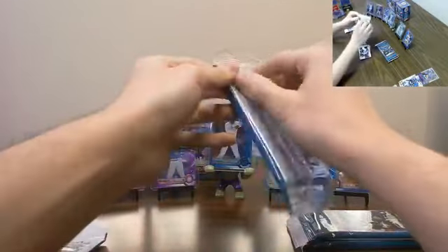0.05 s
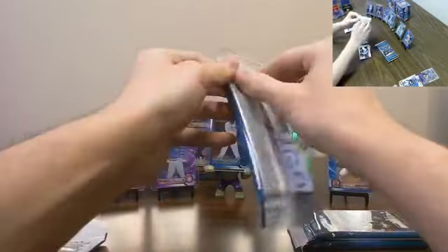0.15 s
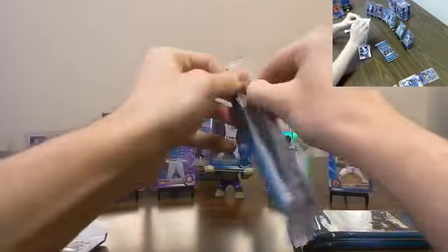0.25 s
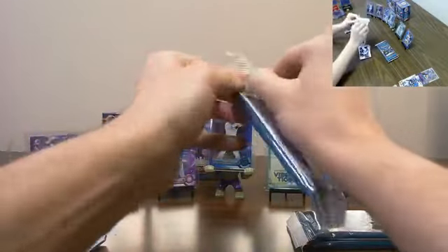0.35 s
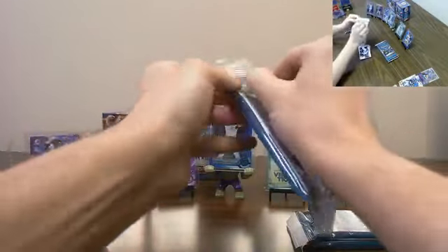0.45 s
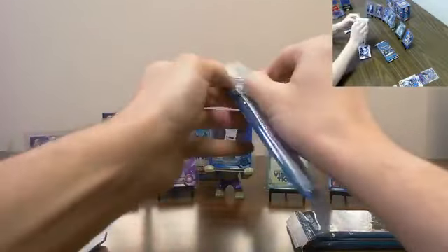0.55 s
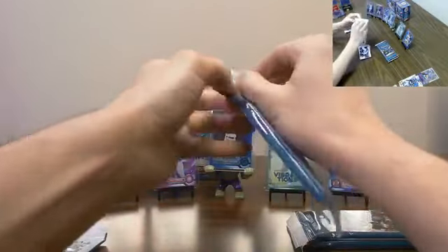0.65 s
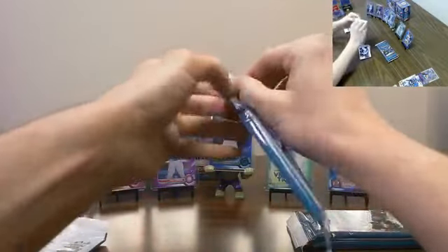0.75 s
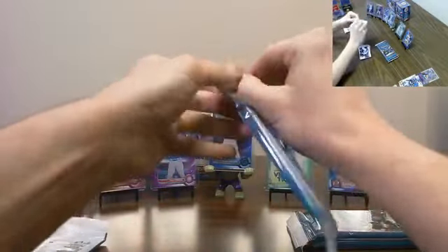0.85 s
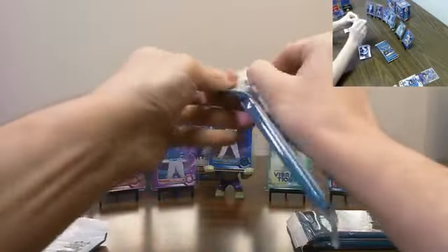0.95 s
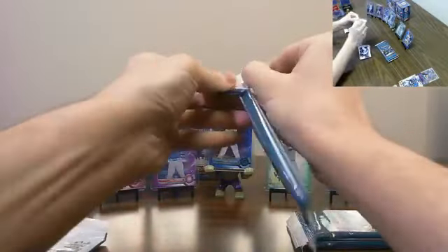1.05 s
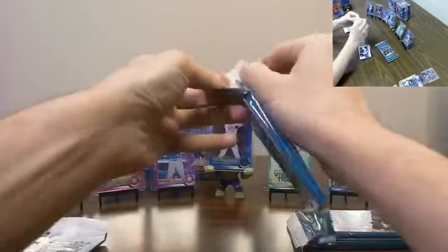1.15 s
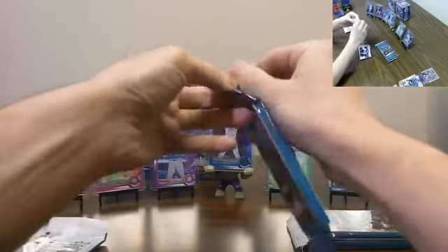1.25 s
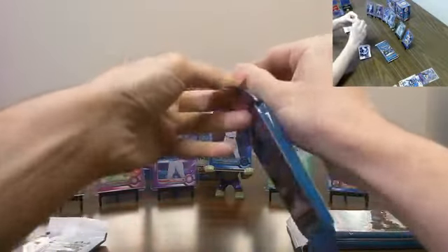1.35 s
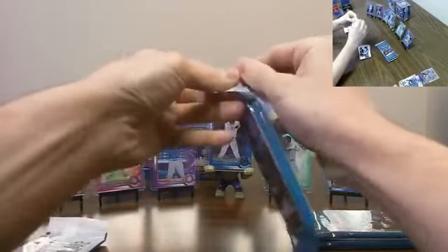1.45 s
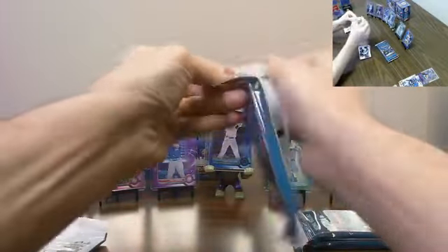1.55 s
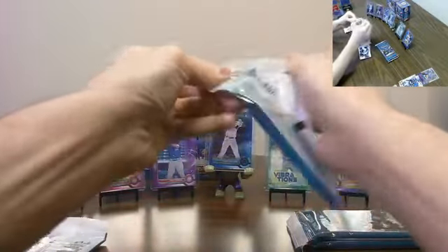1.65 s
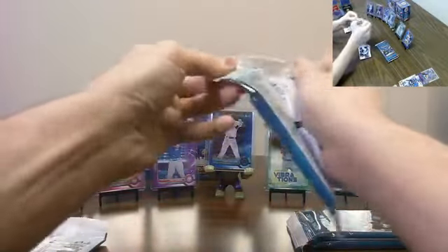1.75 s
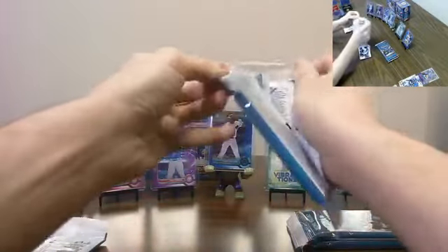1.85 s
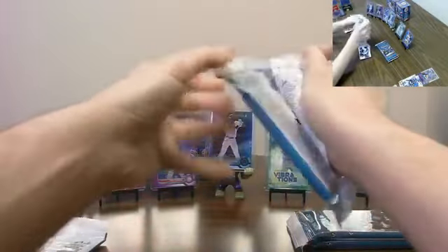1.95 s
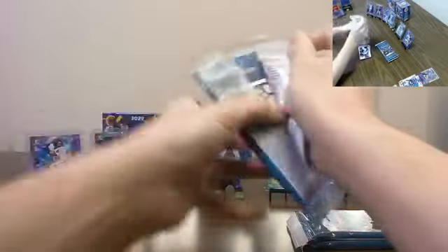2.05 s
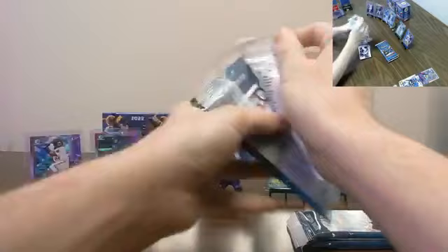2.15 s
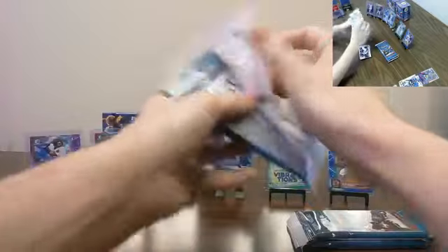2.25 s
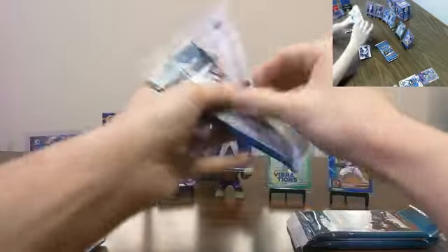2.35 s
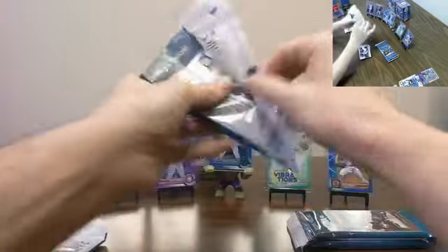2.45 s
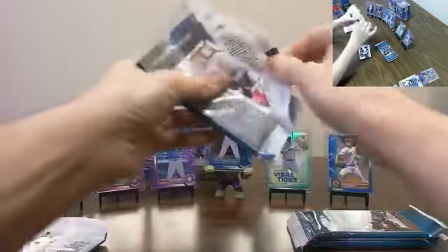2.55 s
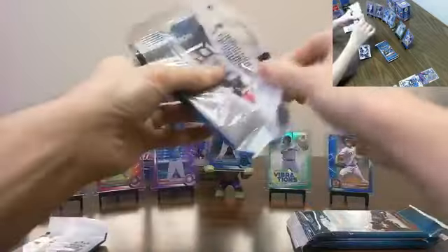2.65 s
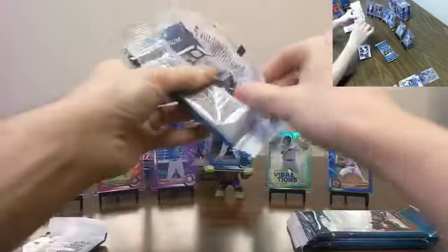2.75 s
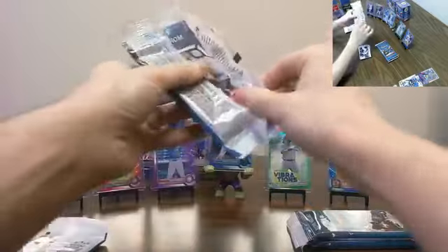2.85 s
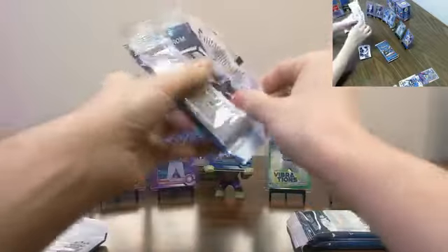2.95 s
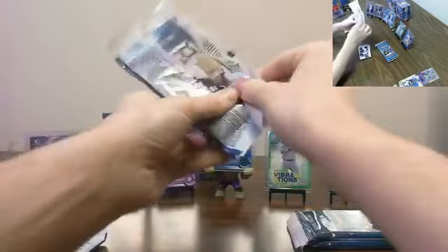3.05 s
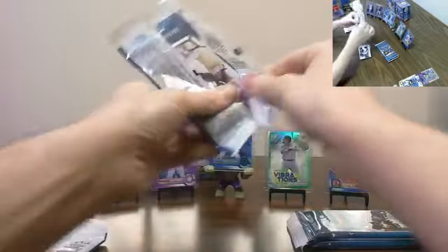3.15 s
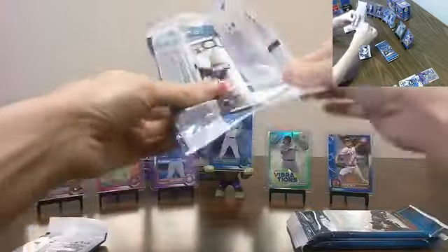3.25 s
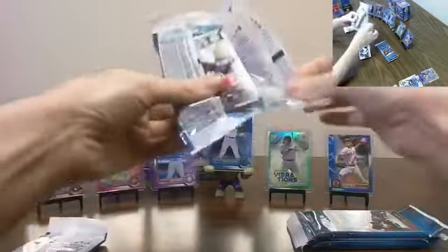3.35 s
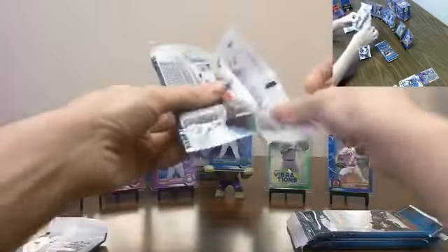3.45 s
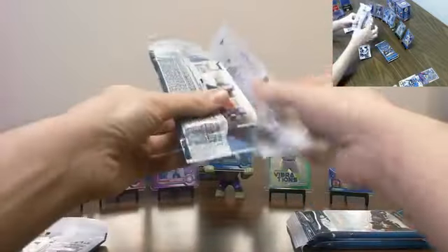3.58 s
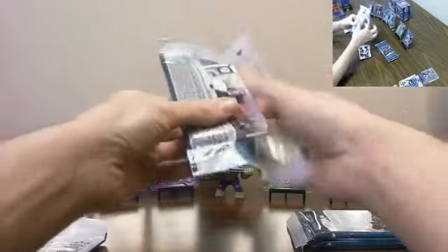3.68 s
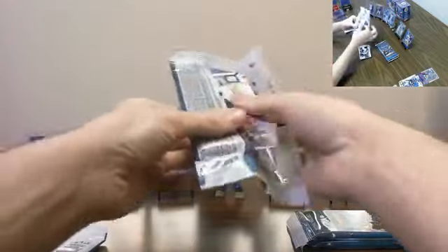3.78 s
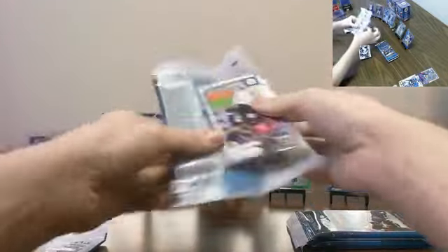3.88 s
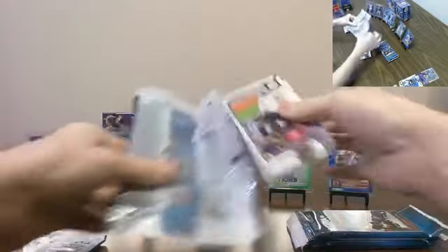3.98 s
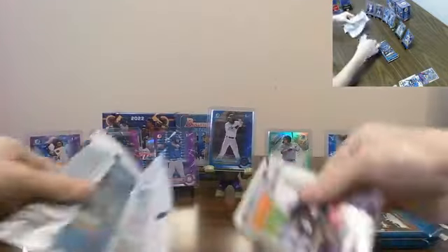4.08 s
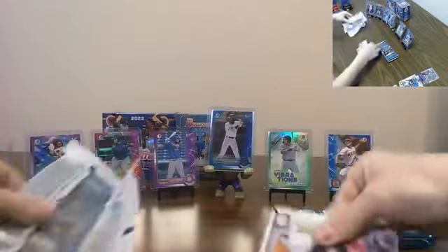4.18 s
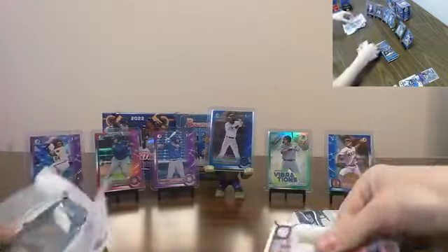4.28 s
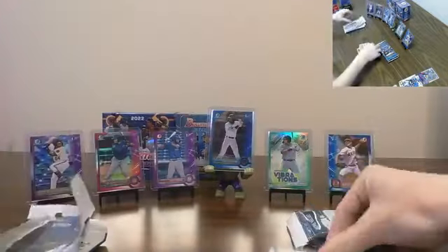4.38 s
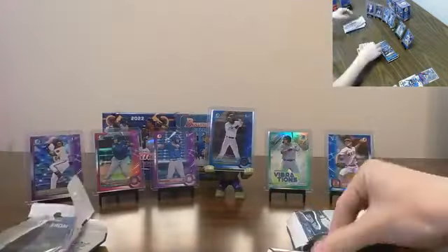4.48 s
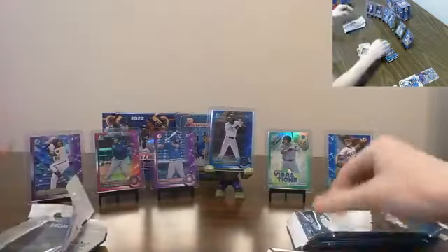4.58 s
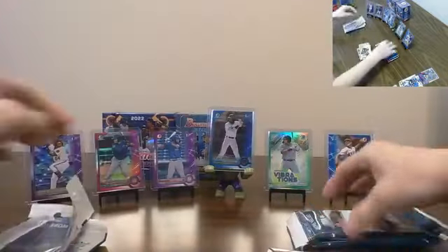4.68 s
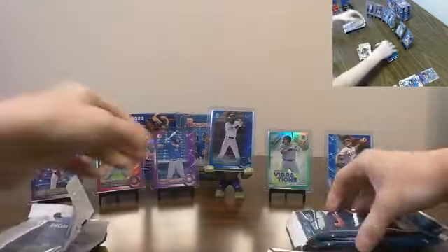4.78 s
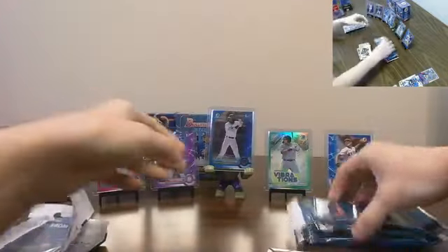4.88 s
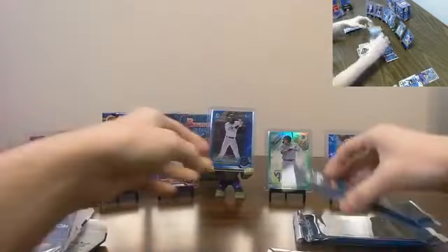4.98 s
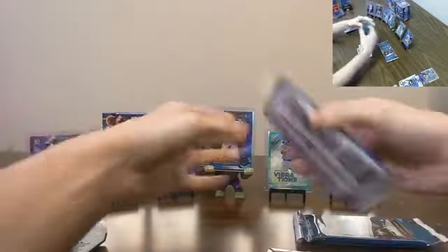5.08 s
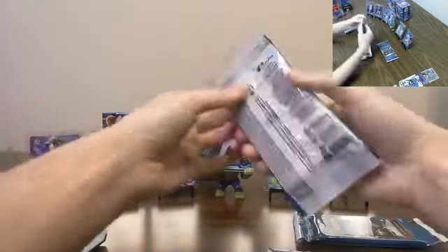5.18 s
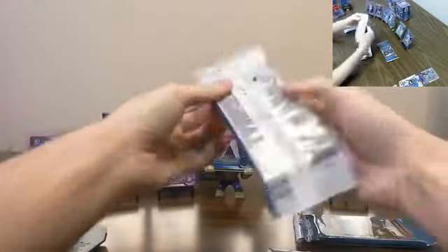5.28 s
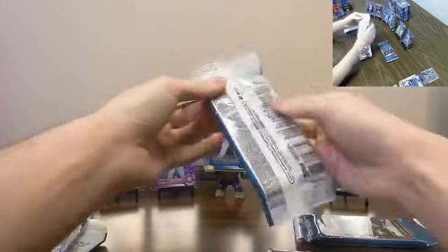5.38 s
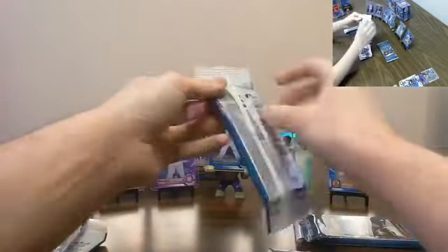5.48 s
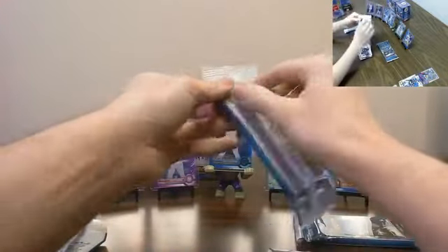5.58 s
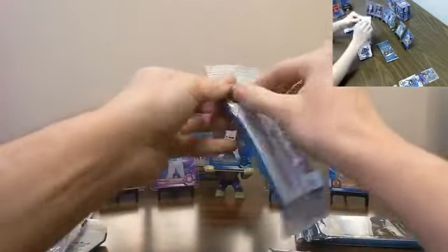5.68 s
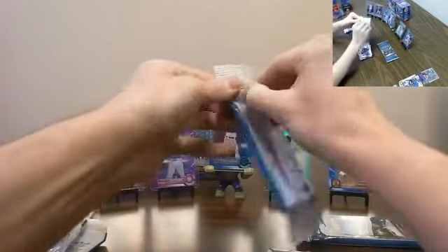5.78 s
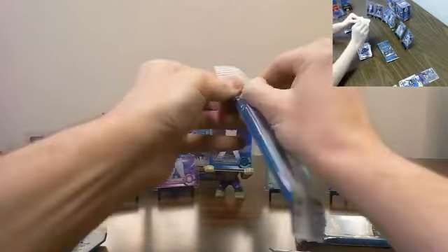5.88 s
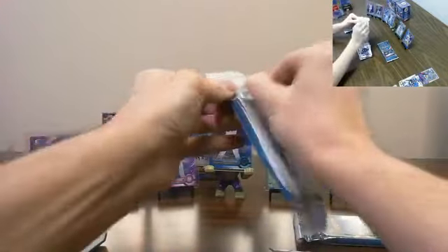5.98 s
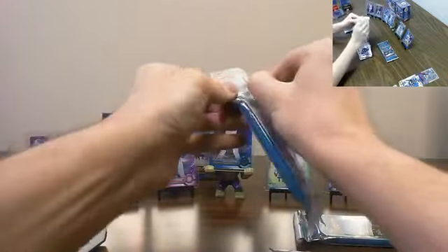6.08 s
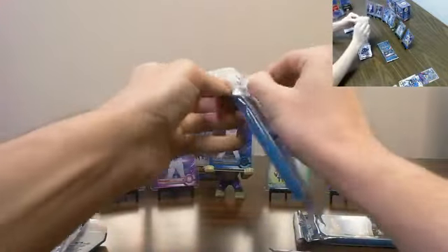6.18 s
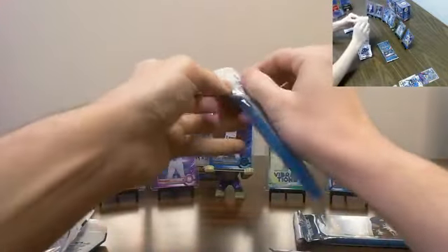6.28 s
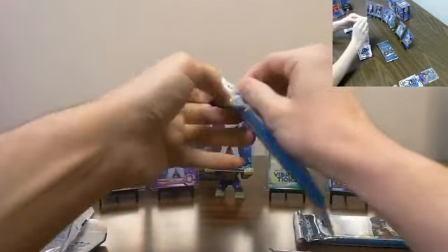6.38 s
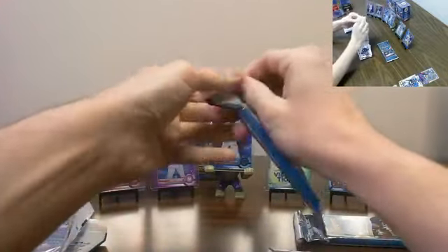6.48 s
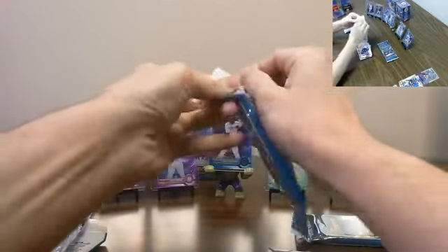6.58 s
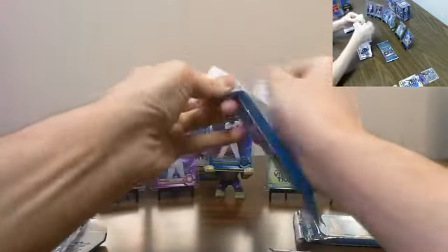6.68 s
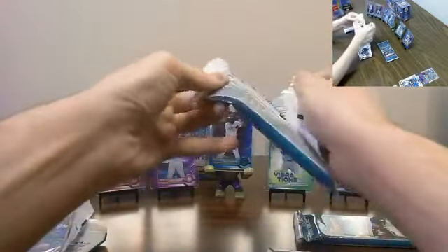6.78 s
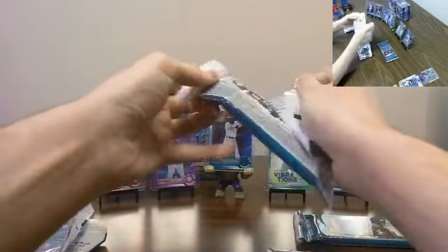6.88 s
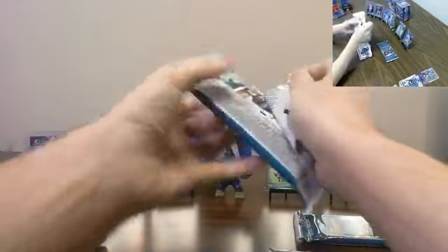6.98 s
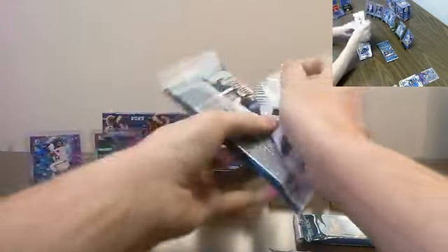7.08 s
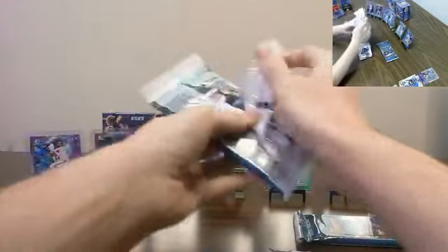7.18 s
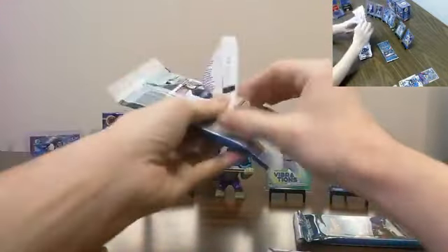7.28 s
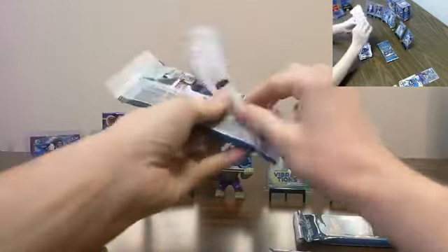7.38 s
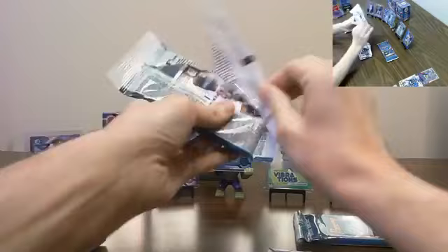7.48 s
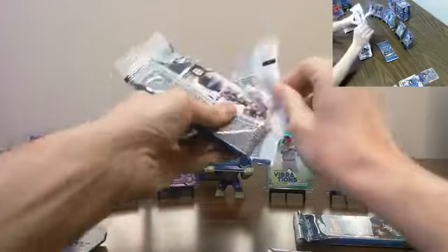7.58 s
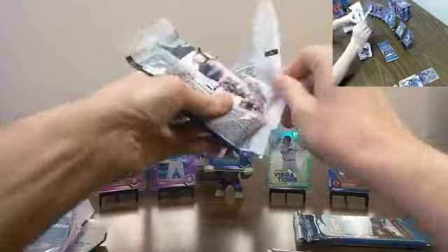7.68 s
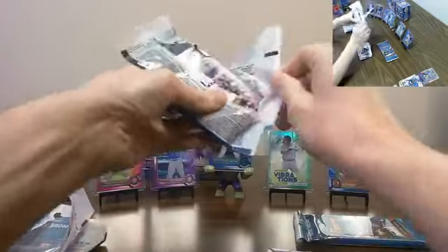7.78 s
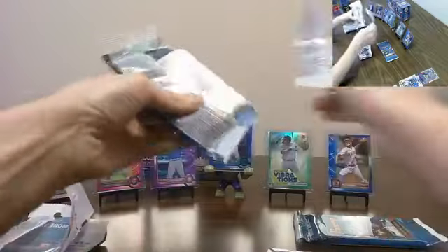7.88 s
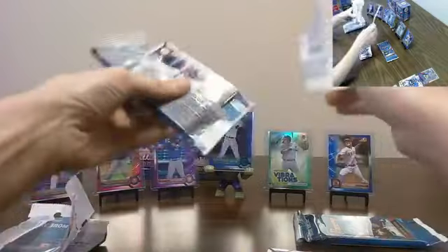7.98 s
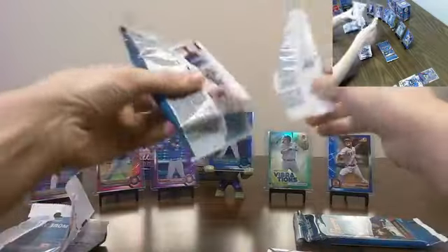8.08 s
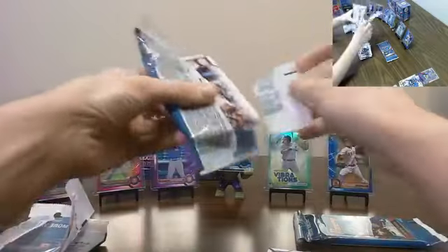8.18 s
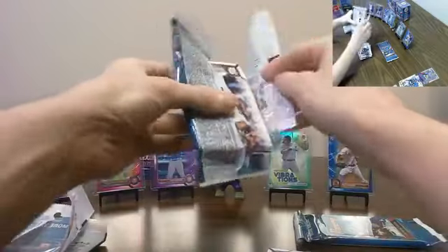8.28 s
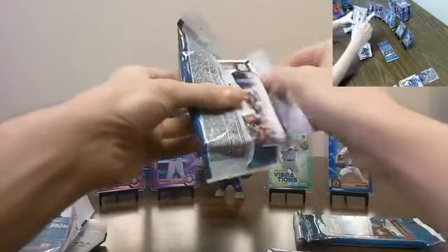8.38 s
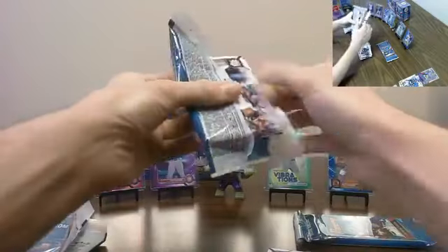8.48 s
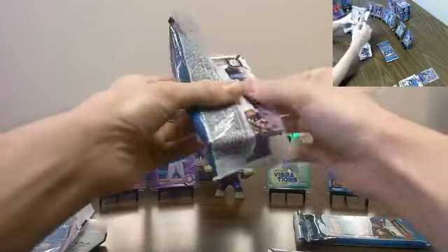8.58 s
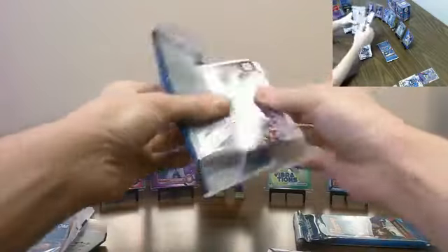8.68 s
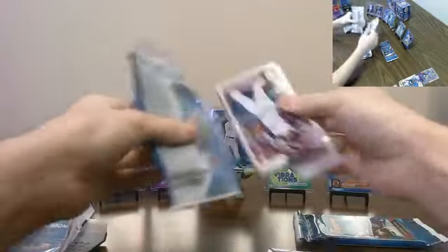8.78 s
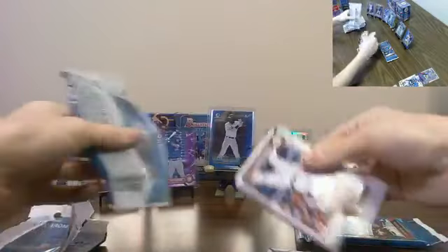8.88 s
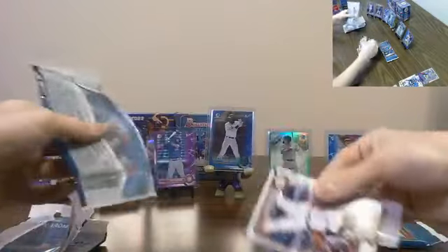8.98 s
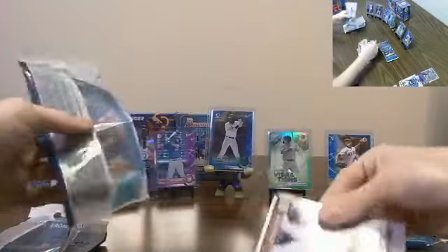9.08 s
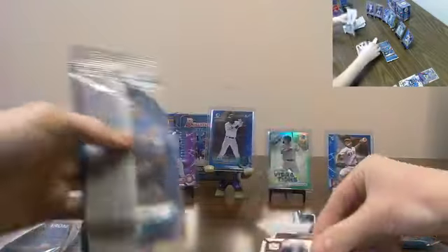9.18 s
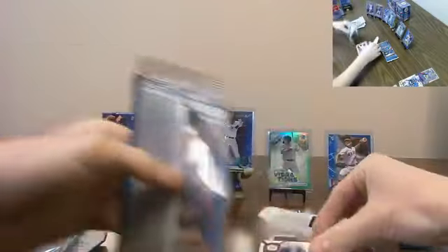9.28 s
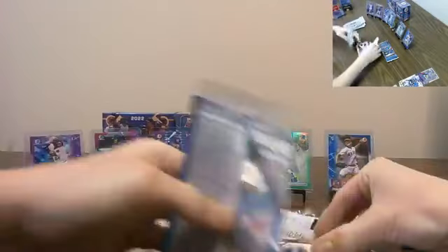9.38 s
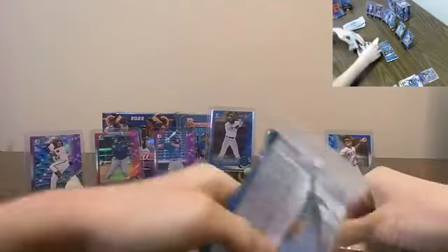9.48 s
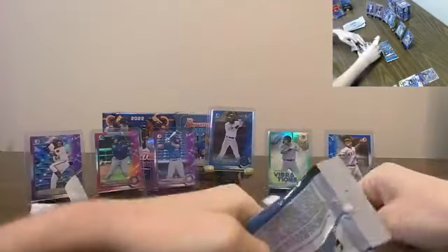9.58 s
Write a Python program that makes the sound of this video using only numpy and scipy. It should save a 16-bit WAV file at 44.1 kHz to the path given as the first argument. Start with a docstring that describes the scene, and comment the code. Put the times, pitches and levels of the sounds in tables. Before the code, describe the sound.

Close up in a small room, fingers pinch and crumple a stiff cellophane pack: sharp bright snaps, dense crinkles, short rips. Cards slide out and land with soft dull knocks. After a near-quiet pause a second pack is picked up, crackled, torn open and emptied the same way. Faint room air, low electrical throb and a barely audible thin whine lie underneath.

```python
'''In a small room, two cellophane card packs are pinched, ripped open and emptied over a table.
Stiff film buckles in single snaps, dense rip runs and small creases: random slips trigger ringing noise clicks.
Sliding film and cards give a fine rub, denser and weaker clicks; knocks are decaying low noise bands.
All of it passes through room echoes; room air, a low electrical throb and a thin whine are added dry.'''
import sys
import numpy as np
from scipy import signal
from scipy.fft import rfft, irfft
from scipy.io import wavfile
from scipy.ndimage import uniform_filter1d

SR = 44100
rng = np.random.default_rng(int(sys.argv[2]) if len(sys.argv) > 2 else 0)


def output_pcm(signal):
    """Save a mono or channel-first signal as 16-bit PCM at the path in sys.argv[1].

    Samples are clipped to [-1, 1] before scaling.
    """
    pcm = np.clip(np.atleast_2d(signal).T, -1, 1) * 32767
    wavfile.write(sys.argv[1], SR, np.round(pcm).astype(np.int16))


N = 425124
TIME_S = np.arange(N) / SR
MIDDLE_HZ = 4200  # reference pitch of the facets
FIRM_DB = -16.5  # table level of a firm snap


# clearest single buckles: start_s, level_db (relative), pitch_hz (nominal)
SNAPS = [(0.069, -35, 3700), (0.1388, -25, 4840), (0.1718, -18.5, 6500), (0.178, -18.5, 4900),
         (0.2103, -18.5, 4770), (0.2265, -15, 6500), (0.2496, -18.5, 4860), (0.2937, -16, 3960),
         (0.3185, -13.5, 5010), (0.3333, -11, 3240), (0.377, -25.5, 3790), (0.4228, -23, 3820),
         (0.4367, -14, 4130), (0.4458, -15, 3960), (0.4813, -24, 3800), (0.5183, -19.5, 4100),
         (0.5259, -14.5, 5000), (0.5662, -22.5, 2810), (0.6185, -20, 4210), (0.7329, -13.5, 5400),
         (0.7728, -30, 4810), (0.836, -39, 1830), (0.9001, -19, 8800), (0.9059, -16.5, 4810),
         (0.9212, -22, 4830), (0.9268, -19, 3780), (0.9364, -27, 4170), (0.9436, -19, 4600),
         (0.9981, -29, 4300), (1.019, -35, 3980), (1.1415, -29, 2990), (1.161, -34, 2950),
         (1.1986, -38, 4150), (1.271, -27, 3660), (1.303, -29.5, 4130), (1.3442, -30, 3000),
         (1.372, -30, 4960), (1.3824, -15, 4600), (1.437, -30.5, 3860), (1.48, -26, 4050),
         (1.498, -22.5, 4260), (1.5818, -21, 4080), (1.6092, -14.5, 3120), (1.6184, -19, 4880),
         (1.6355, -13.5, 4640), (1.6653, -12.5, 4160), (1.6973, -19, 2900), (1.7057, -16, 2880),
         (1.7686, -27, 3900), (1.7934, -16.5, 4330), (1.834, -29, 4660), (1.8572, -28, 4220),
         (1.8663, -16.5, 4260), (1.9943, -20, 2800), (2.0381, -25.5, 2580), (2.1271, -26.5, 3360),
         (2.1855, -20.5, 3740), (2.3089, -29.5, 3100), (2.3574, -23.5, 4580), (2.4377, -28, 2030),
         (2.5323, -16, 6550), (2.581, -16, 5200), (2.6574, -20, 4840), (2.6674, -16.5, 4370),
         (2.7117, -14, 4060), (2.732, -21.5, 4300), (2.7632, -28, 1960), (2.9171, -27, 5660),
         (2.9395, -24, 3000), (3.02, -25.5, 3380), (3.0614, -15.5, 4150), (3.1084, -18, 3000),
         (3.1308, -14, 3120), (3.2701, -9.5, 3770), (3.3636, -15.5, 3960), (3.3832, -12.5, 4270),
         (3.5019, -26, 5300), (3.5927, -14.5, 3670), (3.6066, -23, 4460), (3.6304, -13.5, 4960),
         (3.6766, -20.5, 5450), (3.8921, -25.5, 2960), (4.164, -41.5, 1680), (4.2255, -38, 3400),
         (4.4547, -29.5, 2360), (4.7628, -41, 3450), (4.855, -37, 3490), (5.1699, -40.5, 2870),
         (5.1868, -35, 2580), (5.246, -34, 3410), (5.2654, -18.5, 2975), (5.2894, -26.5, 3720),
         (5.3233, -36, 4660), (5.383, -36, 3780), (5.4323, -42, 4010), (5.5241, -38, 3210),
         (5.5412, -30.5, 4130), (5.5656, -17.5, 4900), (5.688, -23.5, 6500), (5.7238, -25, 4570),
         (5.7658, -28, 4810), (5.7713, -15, 5230), (5.7746, -14, 4500), (5.7997, -24, 3190),
         (5.8053, -16.5, 3340), (5.8973, -20.5, 3400), (5.9764, -8.5, 4040), (6.2095, -20, 5130),
         (6.2412, -14.5, 6190), (6.3466, -16, 6140), (6.467, -34, 3710), (6.4812, -41, 4820),
         (6.554, -16.5, 7150), (6.6183, -14.5, 5100), (6.6326, -10.5, 4700), (6.698, -25, 5560),
         (6.727, -17, 3620), (6.7416, -23, 4560), (6.769, -17.5, 3520), (6.788, -14, 3380),
         (6.8359, -13.5, 6050), (6.9041, -15, 3800), (6.9416, -17.5, 3820), (7.0647, -29.5, 4300),
         (7.1746, -25, 4340), (7.3141, -33.5, 3040), (7.3607, -27, 4870), (7.3835, -19.5, 4020),
         (7.3947, -26, 3140), (7.4178, -20, 4470), (7.4488, -12, 4360), (7.4771, -11, 4030),
         (7.5847, -23, 4300), (7.646, -16.5, 4170), (7.6648, -14.5, 3752), (7.7061, -18.5, 4260),
         (7.7308, -17.5, 2950), (7.8023, -15.5, 3160), (7.882, -15.5, 4270), (7.9176, -20.5, 4440),
         (7.9688, -21, 3250), (7.983, -13.5, 3870), (8.0004, -17, 3260), (8.0515, -24.5, 4170),
         (8.105, -17.5, 4185), (8.1716, -27.5, 3550), (8.2071, -19, 3590), (8.3727, -23.5, 3660),
         (8.4487, -19.5, 3880), (8.6555, -22.5, 3830), (8.6895, -13.5, 6700), (8.7204, -21, 3850),
         (8.7584, -30, 4160), (8.922, -36, 3340), (9.021, -28, 3260), (9.121, -35, 4350),
         (9.1574, -33, 1960), (9.2384, -20.5, 3860), (9.2715, -20.5, 3700), (9.5687, -17.5, 4000),
         (9.6314, -23.5, 4030)]
FOCUS_DB, FOCUS_PER_DB = 4, 0.3  # a firm snap is broad; a gentler one keeps closer to its own pitch


def snaps(level_db=-11.5, push_db=-33, span_s=0.003, stretch=0.83, lift=0.96,
          give_db=-24, give_s=.0015, lag_s=.0005):
    """Single buckles, each with its own pitch; the crease gives a little just before it flips."""
    out = np.zeros(N)
    for start_s, db, hz in SNAPS:
        size = amp(db) * np.sqrt(span_s * SR)
        pitch_hz = lift * MIDDLE_HZ * (hz / MIDDLE_HZ) ** stretch
        focus_db = FOCUS_DB + FOCUS_PER_DB * (FIRM_DB - db)
        add(out, start_s - give_s * rng.random(), size * amp(give_db) * facet(pitch_hz))
        add(out, start_s + lag_s, size * amp(level_db) * facet(pitch_hz, focus_db))
        add(out, start_s + lag_s, size * amp(push_db) * sheet_share(hz) * push())
    return out


# tautness of the film, heard as the pitch of its creases: time_s, pitch_hz
TAUTNESS = [(0, 4190), (.6, 4314), (1.2, 3294), (1.6, 4040), (2.2, 3420), (3.0, 3170), (3.4, 4346),
            (3.9, 2818), (4.3, 2653), (5.2, 2916), (5.7, 4020), (6.4, 4750), (6.9, 4210), (7.2, 3457),
            (8.0, 3700), (8.7, 3760), (9.1, 3180), (9.6, 3585)]


def neighbours(level_db=-33, before_db=-7, before_s=.005, after_s=0.014, growth=1.3, reach=4096):
    """Around each snap smaller creases give: a few as the strain builds, more as the film settles."""
    strain = np.zeros(N)
    t = np.arange(-reach // 2, reach) / SR
    build = amp(before_db) * np.exp(-abs(t) / before_s)
    settle = np.exp(-abs(t) / after_s)
    shape = np.where(t < 0, build, settle)
    for start_s, db, _ in SNAPS:
        add(strain, start_s + t[0], amp(FIRM_DB + growth * (db - FIRM_DB) + level_db) * shape)
    train = strain * slips(N, per_s=550, spread_db=2.5, steady_s=.045)
    return crackle(train, np.interp(TIME_S, *np.transpose(TAUTNESS)), scatter=.5)[:N]


# seam rips: start_s, length_s, level_db (relative), pitch_hz (centre of the slips)
RIPS = [(0.246, 0.023, -33, 5970), (0.312, 0.042, -37, 6420), (0.427, 0.035, -36, 5730),
        (0.9, .05, -36.5, 5180), (1.523, 0.079, -28, 4570), (2.458, 0.041, -22.5, 4200),
        (3.16, 0.018, -30, 4200), (3.181, 0.031, -23, 4350), (3.602, 0.033, -36, 3260),
        (4.385, 0.011, -37.5, 3190), (5.252, 0.012, -44.5, 3920), (5.974, .026, -29.5, 5240),
        (6.582, 0.014, -35.5, 6410), (6.63, 0.081, -32, 4200), (7.447, .04, -31.5, 5590),
        (7.488, 0.063, -26.5, 4200), (7.653, 0.029, -39.5, 4200), (7.808, 0.061, -24, 3930)]
RIP_SAG_DB = -1.5  # the pull slackens from the start of a rip to its end


def rips(level_db=0, push_db=-15.5):
    """The seam gives way in an avalanche of slips that weakens as the pull slackens."""
    out = np.zeros(N)
    for start_s, length_s, db, hz in RIPS:
        size = max(200, int(length_s * SR))
        pull = amp(db + RIP_SAG_DB * np.linspace(-.5, .5, size))
        train = pull * slips(size, per_s=650, spread_db=2, steady_s=0.016)
        add(out, start_s, amp(level_db) * crackle(train, hz, scatter=.55))
        add(out, start_s, amp(push_db) * sheet_share(hz) * signal.fftconvolve(train, push()))
    return out


# fingers squeeze and crumple the film: start_s, length_s, level_db (relative)
SQUEEZES = [(.17, 0.24, -49), (.5, 0.24, -51.5), (1.12, 0.2, -62.5), (1.505, .04, -28.5),
            (1.55, .19, -37.5), (1.8, 0.074, -48), (1.99, 0.21, -58), (2.435, 0.077, -31.5),
            (2.68, 0.034, -35.5), (2.92, 0.042, -50), (3.07, 0.072, -37), (3.12, 0.089, -26.5),
            (3.36, 0.047, -55), (3.59, 0.096, -51), (5.53, 0.041, -48), (5.7, 0.079, -50),
            (5.77, 0.087, -50.5), (5.85, 0.15, -57.5), (5.98, 0.058, -42.5), (6.21, 0.054, -46.5),
            (6.35, 0.039, -47.5), (6.56, 0.21, -42.5), (6.75, 0.19, -51.5), (7.36, .09, -47.5),
            (7.45, 0.11, -48), (7.65, 0.11, -43), (7.87, 0.15, -50.5), (8.65, 0.079, -39.5),
            (9.53, 0.13, -47.5)]
SQUEEZE_ATTACK_S, SQUEEZE_RELEASE_S = 0.014, .018
# film and cards slide under the fingers: start_s, length_s, level_db (relative)
SLIDES = [(.72, 0.052, -70), (1.0, 0.34, -61.5), (1.36, 0.24, -61), (2.19, .05, -56), (2.33, 0.21, -56.5),
          (2.76, 0.094, -64), (3.44, .09, -60.5), (3.7, 0.22, -54.5), (3.86, 0.045, -46.5),
          (4.02, 0.084, -82.5), (4.16, 0.28, -65.5), (4.74, 0.18, -68), (5.02, 0.067, -73.5),
          (5.19, .11, -58), (5.34, 0.16, -70.5), (6.44, .11, -59), (7.06, 0.036, -53.5), (7.17, 0.16, -56),
          (8.02, 0.31, -62.5), (8.45, 0.057, -52.5), (8.62, .16, -55), (8.91, 0.049, -56),
          (9.01, 0.24, -66.5), (9.385, 0.19, -57)]
# a pack in the hand never lies quite still: start_s, length_s, level_db (relative)
HOLDS = [(0, 3.9, -65.5), (5.55, 3.7, -68.5)]
SLIDE_ATTACK_S, SLIDE_RELEASE_S = 0.0047, .015
# fingers damp the treble of the film under them: freq_hz, gain_db
FINGERS = [(4000, -1.5), (9000, -1.5), (15000, -5.5)]


def rustle(level_db=0.5, push_db=-16, rub_db=-7, catch_db=-1, glide_db=-2, drag_db=-22, rub_lift=1.15):
    """Small creases give way under each squeeze; sliding film rubs finer and brighter, with some catches."""
    squeeze = effort(SQUEEZES, SQUEEZE_ATTACK_S, SQUEEZE_RELEASE_S)
    slide = effort(SLIDES + HOLDS, SLIDE_ATTACK_S, SLIDE_RELEASE_S)
    pitch_hz = np.interp(TIME_S, *np.transpose(TAUTNESS))

    crease_effort = squeeze + amp(catch_db) * slide
    creases = crease_effort * slips(N, per_s=130, spread_db=8, steady_s=0.08)
    rub_effort = amp(rub_db) * squeeze + amp(glide_db) * slide
    rub = rub_effort * slips(N, per_s=1800, spread_db=4.5, steady_s=0.042)

    film = amp(level_db) * crackle(creases, pitch_hz, scatter=.44)
    film = film + crackle(rub, pitch_hz * rub_lift, scatter=.55)
    muffled = colour(film[:N], read(FINGERS, bins(size=256)))
    sheet_drive = amp(push_db) * creases + amp(drag_db) * rub
    return muffled + signal.oaconvolve(sheet_drive, push())[:N]


# dull knocks of hands, packs and cards: start_s, level_db (relative), pitch_hz
KNOCKS = [(.728, -46, 320), (1.527, -41, 69.6), (1.997, -40, 315), (2.127, -49.5, 330), (2.187, -51, 209),
          (2.474, -41, 116), (2.485, -43.5, 260), (2.707, -49.5, 328), (3.017, -55, 130), (3.177, -39, 99),
          (3.195, -36, 278), (3.517, -48, 227), (3.608, -46, 141), (3.883, -45, 196), (4.39, -43, 230),
          (4.41, -43.5, 100), (4.456, -53, 170), (5.344, -57, 72.4), (5.559, -51, 300), (5.769, -49, 198),
          (5.897, -46.5, 450), (5.98, -43.5, 325), (7.168, -57, 278), (7.528, -48, 170.1),
          (7.841, -46, 129), (8.007, -48, 346), (8.69, -51, 217), (8.747, -45.5, 390), (9.12, -52, 450),
          (9.604, -54.5, 260)]
KNOCK_T60_S, KNOCK_DAMPING = .075, 0.23  # decay at 200 Hz; power of the pitch by which it shortens


def knocks(level_db=0, focus_db=6, size=8192):
    """Soft blows on card and table: a broad low ring that dies fast, the faster the higher it is."""
    out = np.zeros(N)
    t = np.arange(size) / SR
    for start_s, db, hz in KNOCKS:
        t60_s = KNOCK_T60_S * (200 / hz) ** KNOCK_DAMPING
        fade = amp(-60 * t / t60_s)
        thud = colour(rng.standard_normal(size) * fade, -focus_db * octaves(bins(size), hz) ** 2)
        add(out, start_s, amp(db + level_db) * thud * np.linalg.norm(fade) / np.linalg.norm(thud))
    return out


# spectrum of the film's ring: freq_hz, gain_db (relative)
FILM = [(300, -7.5), (800, -19.5), (1300, -14.5), (1800, -2), (2300, -4.5), (3000, -2.5), (4300, -1.5),
        (5600, -4.5), (6500, -5), (9600, -5.5), (10300, -8.5), (13500, -9), (16000, -18)]


def facet(centre_hz, focus_db=5, ring_s=0.0011, rise_s=.00012, edge=0.95,
          shiver_db=-21, shiver_s=0.015, size=512):
    """One facet flips: a millisecond of flutter rings near its pitch, then the sheet shivers; energy one."""
    t, hz = np.arange(size) / SR, bins(size)
    fade = np.exp(-t / ring_s) + amp(shiver_db) * np.exp(-t / shiver_s)
    flutter = rng.standard_normal(size) * fade * (1 - np.exp(-t / rise_s))
    flutter[4] += 2 * edge  # sharp edge of the flip
    away = octaves(hz, centre_hz)
    ring_db = 5 / (1 + ((away - rng.uniform(-.7, .5)) / .22) ** 2)
    slope_db = focus_db * (np.sqrt(1 + 4 * away ** 2) - 1)
    click = colour(flutter, read(FILM, hz) + ring_db - slope_db)
    return click / np.linalg.norm(click)


# spectrum of the whole sheet's push: freq_hz, gain_db (relative)
SHEET = [(70, -7), (160, -8.5), (250, -1.5), (430, -3.5), (600, -3.5), (900, -3), (1500, -0.5),
         (4000, -66.5)]


def push(size=1024, rough=0.12, ring_s=0.0041):
    """The whole sheet jerks and shoves the air; energy one."""
    jerk = rough * rng.standard_normal(size) * np.exp(-np.arange(size) / SR / ring_s)
    jerk[0] += 1
    pulse = colour(jerk, read(SHEET, bins(size)))
    return pulse / np.linalg.norm(pulse)


PUSH_DB_PER_OCTAVE = -9.5


def sheet_share(hz):
    """Large, low-pitched facets jerk more of the sheet."""
    return amp(PUSH_DB_PER_OCTAVE * octaves(hz, MIDDLE_HZ))


def slips(size, per_s, spread_db, steady_s):
    """Random slips of very unequal size; the steady pull keeps their mean power near one."""
    sizes = amp(spread_db * np.minimum(rng.exponential(1, size), 4))
    train = (rng.random(size) < per_s / SR) * sizes
    power = uniform_filter1d(train ** 2, max(2, int(steady_s * SR)))
    return train * rng.choice([-1, 1], size) / np.sqrt(np.maximum(power, per_s / SR))


def crackle(train, centre_hz, scatter, count=14):
    """Each slip flips one of a set of facets, pitched around centre_hz; scatter in octaves."""
    pitches_hz = np.geomspace(1500, 11000, count)
    shapes = [facet(hz) for hz in np.repeat(pitches_hz, repeats=3)]
    at = np.flatnonzero(train)
    centre_oct = np.log2(np.broadcast_to(centre_hz, train.shape)[at])
    wanted_oct = centre_oct + scatter * rng.standard_normal(len(at))
    index = np.interp(wanted_oct, np.log2(pitches_hz), np.linspace(0, len(shapes) - 1, count))
    which = index.round().astype(int)
    out = np.zeros(len(train) + len(shapes[0]))
    for i, k in zip(at, which):
        add(out, i / SR, train[i] * shapes[k])
    return out


def effort(gestures, attack_s, release_s):
    """Each gesture of the fingers builds up, holds and lets go; their powers add."""
    power = np.zeros(N)
    for start_s, length_s, db in gestures:
        t = np.arange(0, length_s + 10 * release_s, 1 / SR)
        attack = np.minimum(t / attack_s, 1)
        release = np.exp(-np.maximum(t - length_s, 0) / release_s)
        add(power, start_s, (amp(db) * attack * release) ** 2)
    return np.sqrt(power)


# hollow between hands and table: freq_hz, width_hz, gain_db
HOLLOW = [(413.4, 27, 7.5), (505, 39, 5.5), (1240, 180, 6.5), (1530, 45, 2.5), (3700, 200, -0.5),
          (6530, 400, 4)]


def room(x, count=5):
    """Hollow of the hands, then five random room tails in turn, 1/20 s each, so no one tail colours all."""
    hz = bins(size=8192)
    hollow_db = sum(db / (1 + (2 * (hz - f) / width) ** 2) for f, width, db in HOLLOW)
    held = colour(x, hollow_db)
    turn = (TIME_S * 20).astype(int) % count
    return sum(signal.oaconvolve(held * (turn == k), walls())[:N] for k in range(count))


# early reflections: delay_s, level_db
ECHOES = [(0.01, -28.5), (.0127, -22), (.0146, -23.5), (.047, -38), (.0545, -36.5), (.067, -36.5)]
# decay of the room: freq_hz, t60_s
ROOM_T60 = [(100, .36), (500, .31), (2000, .28), (5000, .29), (9000, .29), (12000, .27), (16000, .24)]


def walls(wet_db=-14.5, build_s=0.0034, size=24576):
    """The direct path, a few scattered echoes and the short tail of the room."""
    t = np.arange(size) / SR
    hits = rng.choice([-1, 1], size) * (rng.random(size) < 9000 / SR)
    taps = hits * (1 - np.exp(-t / build_s))
    hz, frame_s, z = signal.stft(taps, SR, nperseg=256)
    decay = amp(-60 * frame_s / read(ROOM_T60, hz)[:, None])
    tail = signal.istft(z * decay, SR, nperseg=256)[1]
    response = amp(wet_db) * tail / np.linalg.norm(tail)
    response[0] += 1  # direct path
    for delay_s, db in ECHOES:
        smear = rng.standard_normal(64) * np.exp(-np.arange(64) / 20)
        add(response, delay_s, amp(db) * smear / np.linalg.norm(smear))
    return response


# spectrum of the room air: freq_hz, density_db (relative, per Hz)
AIR = [(14, 2), (30, -9), (70, -7), (110, -13), (200, -21), (350, -25), (700, -28), (1000, -34),
       (2000, -42.5), (4000, -42.5), (8000, -50.5), (11000, -55), (16000, -60)]
AIR_DB = -58  # rms
# thin whine: freq_hz, level_db (rms)
WHINE = [(452, -79), (1416, -83.5), (5626, -92.5), (8000, -102.5)]


def background(throb_db=-62):
    """Room air as shaped noise, the microphone's low electrical throb of rounded pulses and its sine whine."""
    air = unit(irfft(rfft(rng.standard_normal(N)) * amp(read(AIR, bins(N))), N))
    cycle = (TIME_S * 25.23 + .365) % 1 - .5  # 25.23 Hz
    pulses = np.exp(-abs(cycle / .115) ** 3)
    throb = unit(pulses - pulses.mean())
    whine = sum(amp(db) * np.sqrt(2) * np.sin(2 * np.pi * hz * TIME_S) for hz, db in WHINE)
    return amp(AIR_DB) * air - amp(throb_db) * throb + whine


def amp(db):
    """Decibels to gain."""
    return 10 ** (np.asarray(db) / 20)


def unit(x):
    """Scales to an rms of one."""
    return x / np.sqrt(np.mean(x ** 2) + 1e-20)


def read(points, hz):
    """Reads a table on a log-frequency axis."""
    f, value = np.transpose(points)
    return np.interp(np.log(hz + 1), np.log(f + 1), value)


def add(mix, start_s, sound):
    """Mixes a sound in at start_s."""
    part = mix[max(0, round(start_s * SR)):][:len(sound)]
    part += sound[:len(part)]


def bins(size):
    """Frequencies of a spectrum in Hz."""
    return np.fft.rfftfreq(size, 1 / SR)


def causal(db):
    """Minimum-phase impulse response: the most compact causal click with this spectrum."""
    log_gain = np.log(amp(np.maximum(db, db.max() - 80)))
    circle = np.concatenate([log_gain, log_gain[-2:0:-1]])
    return irfft(np.exp(np.conj(signal.hilbert(circle)))[:len(db)])


def colour(x, db):
    """Passes x through a causal filter."""
    return signal.oaconvolve(x, causal(db))[:len(x)]


def octaves(hz, centre_hz):
    """Distance from a centre frequency in octaves."""
    return np.log2((hz + 1) / centre_hz)


def scene():
    """All the handling in the room, over the background."""
    handling = snaps() + neighbours() + rips() + rustle() + knocks()
    return (room(handling) + background())[None]


EDGE_HZ = 15850


def record(dry):
    """Rounds off the sharpest peaks, then limits the band."""
    rounded = .24 * np.tanh(dry / .24)
    lowpass = signal.firwin(255, EDGE_HZ, window=("kaiser", 8), fs=SR)
    return signal.oaconvolve(rounded, lowpass[None], "same")


dry = scene()
out = record(dry)
output_pcm(out)
```